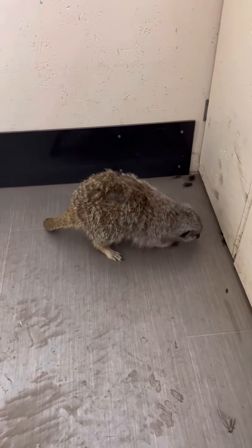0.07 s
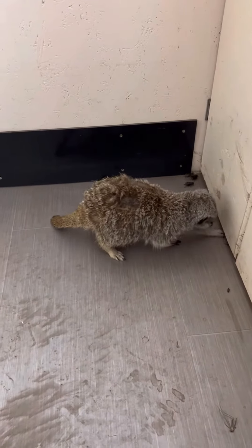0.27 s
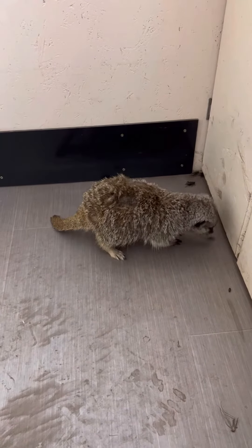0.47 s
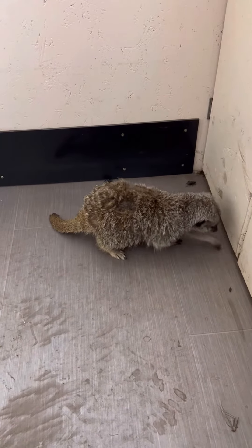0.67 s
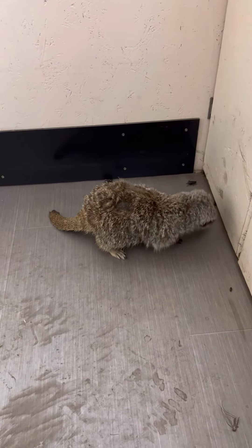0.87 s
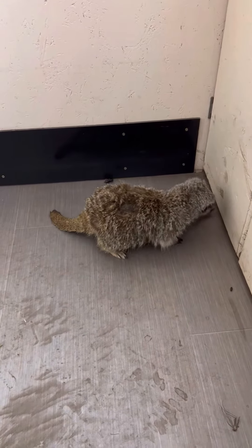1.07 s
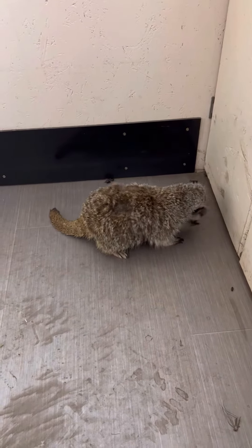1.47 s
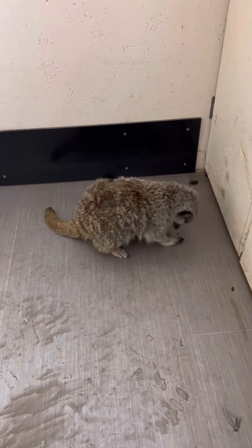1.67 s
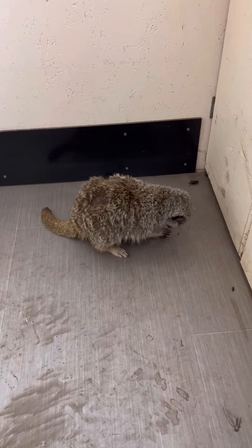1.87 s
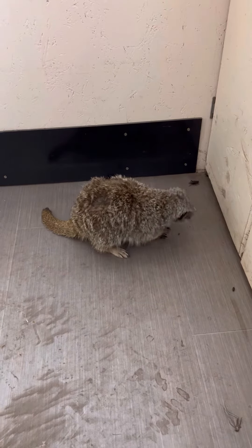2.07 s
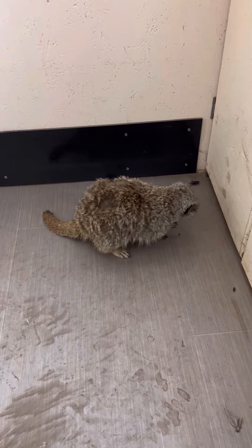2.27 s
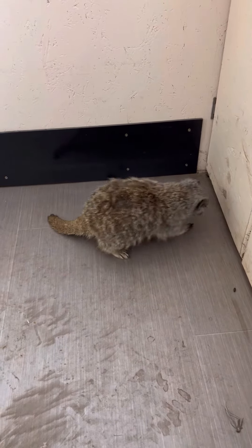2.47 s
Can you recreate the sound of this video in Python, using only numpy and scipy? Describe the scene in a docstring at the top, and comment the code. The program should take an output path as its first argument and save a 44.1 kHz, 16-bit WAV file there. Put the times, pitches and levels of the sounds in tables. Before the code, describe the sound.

Small animal claws scrape and thump a wall panel indoors, then tick on a hard floor.

```python
"""A meerkat paws at a wall panel and patters on the hard floor of a small indoor enclosure.
In each swipe the claws knock and scrape, the paw thuds and the loose panel booms; light claw
ticks and soft shuffles fall in between. A thin three-beat chirp, probably a cricket rubbing its
wings, sounds farther off, with more of the room on it. Heard from nearby on a closely spaced
pair of microphones, over the low rumble of the room."""
import sys
import numpy as np
from scipy import signal
from scipy.fft import rfft, irfft
from scipy.io import wavfile

SR = 44100
rng = np.random.default_rng(int(sys.argv[2]) if len(sys.argv) > 2 else 0)


def inscribe(sig):
    """Save sig as 16-bit PCM at rate SR to the path in sys.argv[1].

    A 1-D sig is mono; a 2-D sig holds one channel per row.
    Samples are clipped to [-1, 1] before scaling.
    """
    pcm = np.round(np.clip(np.atleast_2d(sig).T, -1, 1) * 32767)
    wavfile.write(sys.argv[1], SR, pcm.astype(np.int16))


N = 110250

# room tone, spectra of the air noise and of the rumble: f/Hz, relative level/dB
AIR_SPECTRUM = [(130, -8.5), (370, -17), (840, -23), (1500, -25.5), (2200, -18.5), (3250, -23.5),
                (6400, -25), (8200, -22.5), (9200, -38), (11300, -28), (12200, -77.5), (16000, -91)]
RUMBLE_SPECTRUM = [(30, -39.5), (42, 1), (60, 1.5), (85, -4.5), (125, -4.5), (200, -15.5), (350, -23.5),
                   (600, -64.5)]
# reverberation of the enclosure: f/Hz, t60/s
ROOM_DECAY = [(100, 0.53), (500, 0.32), (1500, 0.39), (4000, 0.37), (8000, 0.37), (11500, 0.44),
              (13000, 0.045)]
# cricket chirps: t/s, level/dB
CRICKET_CHIRPS = [(.197, -42.5), (.922, -44.5), (1.562, -43), (2.278, -43.5)]
# wing beats of one chirp: delay/s, level re chirp/dB, f/Hz
WING_BEATS = [(0, -16.5, 4950), (.054, -3.5, 4985), (.103, -4, 4985)]
# feet shuffle on the floor: t/s, length/s, level/dB, centre f/Hz
FOOT_SHUFFLES = [(0.037, 0.037, -62, 947), (1.644, 0.063, -59.5, 367), (1.883, 0.048, -68, 503),
                 (2.035, .05, -66, 1660), (2.276, 0.22, -65.5, 340)]
# claw tips tick on the floor: t/s, base level/dB, offset of the dull part/dB
FLOOR_TICKS = [(0.028, -53, -2), (0.036, -46, -7.5), (0.151, -48.5, -29), (0.2916, -44, 7),
               (0.3814, -46.5, 0.5), (0.6366, -49, -15), (0.7008, -48, -7), (0.758, -55.5, 2),
               (0.8243, -59, -14), (1.105, -31.5, -21), (1.371, -52, -7.5), (1.4155, -47.5, -15),
               (1.4447, -39, -12), (1.452, -40, -8.5), (1.5308, -40.5, -30), (1.5413, -44, -12),
               (1.5808, -47, -0.5), (1.9577, -43.5, -8), (2.106, -45, -1), (2.1121, -51.5, 9),
               (2.147, -49, -2), (2.1728, -48, -3.5), (2.401, -44, -9), (2.405, -37, -5),
               (2.486, -45, -1.5)]
# spectra of a tick, bright claw tip and dull floor: f/Hz, relative level/dB
TIP_SPECTRUM = [(500, -24.5), (2500, -12.5), (4500, -12), (6000, 6), (7200, 2), (9500, -4.5),
                (11600, -12.5), (13000, -14), (16000, -49)]
FLOOR_SPECTRUM = [(200, -0.5), (700, -12), (1500, -10), (2600, -6), (4000, 13.5), (5500, -12), (9000, -38)]
# the whole panel swings until a paw stills it: t/s, level/dB, free time/s
PANEL_BOOMS = [(0.241, -30, 0.085), (.345, -39.5, 0.099), (0.576, -28, 0.313), (0.928, -22, 0.19),
               (1.105, -21, 0.394), (2.17, -45.5, 0.23)]
# low panel modes, rung by the paw: f/Hz, relative level/dB, t60/s
LOW_MODES = [(95.8, -13, 1), (131.8, -11, 0.57), (175, -4, 0.26), (216, -4.5, 0.096), (304, -20, 0.17),
             (328.2, -5, 0.11), (346.4, -9, 0.27), (380, -12, 0.3), (519.5, -15, 0.34), (748, -14.5, 0.43)]
# high panel modes, rung by the claws: f/Hz, relative level/dB, left minus right/dB
HIGH_MODES = [(1300, -40, 8), (2365, -13.5, 1), (2350, 2, 13), (2827, -8, -15), (3050, -26, -13),
              (3310, 2.5, 11), (4120, 7.5, 0), (4140, -27, -3)]
# the paw lands on the panel: t/s, level/dB, contact time/s, punch f/Hz, punch re ring/dB
PAW_THUDS = [(0.2194, -35.5, 0.0023, 185, -5), (0.2351, -31, 0.002, 347, -21),
             (0.5462, -38.5, 0.00066, 275, -2), (0.5563, -30.5, 0.0029, 154, 3.5),
             (0.9361, -27.5, 0.0015, 180, -13), (1.0967, -30, 0.0013, 236, -16),
             (1.1245, -24, 0.0017, 303.5, -2), (1.896, -43, 0.0053, 85, 2), (2.196, -36.5, 0.0069, 128, -6)]
# claws and pads drag: t/s, length/s, level/dB, treble tilt/(dB per octave)
CLAW_SCRAPES = [(-0.003, 0.098, -59.5, 5), (0.093, 0.093, -61.5, 0.5), (0.189, 0.046, -56, 3),
                (0.208, 0.073, -43, -4.5), (0.245, 0.13, -49, 0), (0.368, 0.056, -51, 1),
                (0.508, 0.074, -39, -1), (0.58, 0.061, -38, -1), (0.671, 0.2, -55, 0.5),
                (0.875, 0.034, -55.5, 3.5), (0.899, 0.068, -36, -2.5), (0.955, 0.11, -49, -1.5),
                (1.086, 0.032, -35, 0.5), (1.111, 0.066, -33.5, -4.5), (1.159, 0.1, -44, -2),
                (1.427, 0.064, -58.5, 4.5), (1.603, 0.12, -66.5, 6), (1.963, 0.037, -56, -0.5),
                (2.037, 0.2, -61.5, 4), (2.358, 0.13, -60, 0.5)]
# spectrum of a scrape before its tilt: f/Hz, relative level/dB
RASP_SPECTRUM = [(200, -2), (700, -5.5), (1100, -7), (1700, -1.5), (2800, -0.5), (4500, -4.5), (7000, -6.5),
                 (8700, -8), (10000, -18), (11600, -16), (12600, -33), (16000, -41)]
# claws knock on the panel: t/s, level/dB, ring f/Hz, crack re ring/dB, catch time/s
CLAW_KNOCKS = [(0.2132, -29, 2980, -7, 0.0045), (.227, -37, 3700, -7.5, 0.0038),
               (0.2306, -32, 2550, -7, 0.0029), (.2725, -38.5, 2930, 2.5, 0.0024),
               (0.3907, -35.5, 4360, -23, 0.0036), (0.397, -36, 3660, -24, 0.005),
               (0.5169, -28.5, 2920, -7.5, 0.0044), (.548, -35, 3940, 6, 0.0017),
               (0.583, -39, 2590, 1, 0.0047), (0.901, -30, 3180, -7, 0.0053),
               (.922, -28, 2520, -11.5, 0.004), (1.082, -32, 4000, -9.5, 0.0048),
               (1.0873, -23, 2900, -9.5, 0.0036), (1.0937, -27.5, 4250, 1, 0.0034),
               (1.12, -23, 4380, -11, 0.0019), (1.1297, -17, 2815, 2.5, 0.0019)]
# spectrum of a knock's woody ring: multiple of the ring pitch, relative level/dB
WOODY_SPECTRUM = [(.1, -36), (.4, -29), (.75, -12), (1, 1), (1.17, -10), (1.45, -7.5), (1.8, -24.5),
                  (4, -45)]
# spectrum of a knock's crack: f/Hz, relative level/dB
CRACK_SPECTRUM = [(200, -31), (800, -10.5), (1500, -2.5), (2700, 2), (4300, -5), (5500, -5.5), (7000, -2.5),
                  (8700, -11.5), (10500, -17), (16000, -34)]

CLAW_SIDE_DB = -8  # stereo width of the animal's sounds, side re mid


def amp(db):
    """Decibels to gain."""
    return 10 ** (np.asarray(db) / 20)


def unit_rms(x):
    """Scales to rms 1."""
    return x / np.sqrt(np.mean(x ** 2) + 1e-20)


def value_at(points, hz):
    """Reads a table on a log-frequency axis."""
    f, value = np.transpose(points)
    return np.interp(np.log(hz + 1), np.log(f + 1), value)


def add(mix, start, sound):
    """Mixes a sound in at a start time in seconds."""
    part = mix[..., max(round(start * SR), 0):][..., :sound.shape[-1]]
    part += sound[..., :part.shape[-1]]


def filtered(x, order, hz, kind):
    """Causal Butterworth filter."""
    return signal.sosfilt(signal.butter(order, hz, kind, fs=SR, output="sos"), x)


def colour(x, spectrum, tilt_db=0, size=4096, pivot_hz=3530):
    """Causal filter of unit energy with the given spectrum and tilt per octave."""
    hz = abs(np.fft.fftfreq(size, 1 / SR))
    octaves = np.log2(np.maximum(hz / pivot_hz, 0.1))
    log_gain = np.log(amp(value_at(spectrum, hz) + tilt_db * octaves))
    minimum_phase = np.exp(np.conj(signal.hilbert(log_gain)))
    taps = np.fft.ifft(minimum_phase).real[:size // 2]
    return signal.fftconvolve(x, taps[None] / np.linalg.norm(taps), axes=1)[:, :x.shape[1]]


def stereo_noise(size, side_db):
    """Two channels of noise, more alike the lower side_db is."""
    mid, side = rng.standard_normal((2, size))
    return unit_rms(mid + amp(side_db) * np.array([side, -side]))


def wobble(span_s):
    """A smooth random curve of rms 1 that changes over about span_s seconds."""
    hz = np.fft.rfftfreq(N, 1 / SR)
    return unit_rms(irfft(rfft(rng.standard_normal(N)) * np.exp(-(hz * span_s) ** 2), N))


def snap(decay_s, rise_s=0.00039, size=2048):
    """A tiny cluster of contacts that dies within milliseconds."""
    t = np.arange(size) / SR
    fade = np.exp(-t / decay_s) * (1 - np.exp(-t / rise_s))
    return unit_rms(stereo_noise(size, CLAW_SIDE_DB) * fade) * np.sqrt(np.mean(fade ** 2))


def room_tone(rumble_db=-58.5, waver_db=3.5, air_db=-67.5):
    """A wavering rumble, alike at both microphones, and faint air noise all around."""
    t = np.arange(N) / SR
    waver = unit_rms(sum(np.sin(2 * np.pi * (hz * t + rng.random())) for hz in np.geomspace(2, 12, 20)))
    rumble = unit_rms(colour(stereo_noise(N, side_db=-59), RUMBLE_SPECTRUM, size=16384))
    air = unit_rms(colour(stereo_noise(N, side_db=1.2), AIR_SPECTRUM))
    return amp(rumble_db - waver_db * waver) * rumble + amp(air_db) * air


def room_echo(x, early_db=-4.5, early_s=0.013, tail_db=-11.5, correlation=0.78, echo_top_hz=12400):
    """Quick reflections from the corner, then the tail of a small hard room."""
    size = SR // 2
    t = np.arange(size) / SR
    left, other = rng.standard_normal((2, size))
    right = correlation * left + np.sqrt(1 - correlation ** 2) * other
    hz, frame_s, spectra = signal.stft(np.array([left, right]), SR, nperseg=256)
    decay = amp(-60 * frame_s / value_at(ROOM_DECAY, hz)[:, None])
    tail = signal.istft(spectra * decay, SR, nperseg=256)[1][:, :size] * np.minimum(t / 0.0057, 1)
    early = stereo_noise(size, side_db=0.3) * np.exp(-t / early_s)
    early *= (rng.random(size) < 1500 / SR) * (t > 0.002)  # sparse arrivals after 2 ms
    response = (amp(tail_db) * unit_rms(tail) + amp(early_db) * unit_rms(early)) / np.sqrt(size)
    return signal.fftconvolve(x, filtered(response, 4, echo_top_hz, "low"), axes=1)[:, :N]


def close_pair(x, below_hz=430, share=0.62):
    """The microphones sit close together, so low sounds reach both much alike."""
    low_side = signal.sosfiltfilt(signal.butter(2, below_hz, fs=SR, output="sos"), (x[0] - x[1]) / 2)
    return x - share * np.array([low_side, -low_side])


def cricket(beat_s=0.017, sag_hz_per_s=6200, wing_gap_hz=170, wing_db=-6.5, roughness=0.22):
    """Three strokes a chirp; the two wings ring slightly apart, so each stroke flutters as it sags."""
    out, t = np.zeros(N), np.arange(0, beat_s, 1 / SR)
    swell = np.sin(np.pi * t / beat_s)
    for start, db in CRICKET_CHIRPS:
        for delay, beat_db, hz in WING_BEATS:
            cycles = np.cumsum(hz - sag_hz_per_s * (t - beat_s / 2)) / SR
            wings = np.sin(2 * np.pi * cycles)
            wings += amp(wing_db) * np.sin(2 * np.pi * (cycles + wing_gap_hz * t + rng.random()))
            jitter = signal.oaconvolve(rng.standard_normal(4096), np.hanning(SR // 400), "valid")
            teeth = 1 + roughness * unit_rms(jitter)[:len(t)]
            add(out, start + delay, amp(db + beat_db) * teeth * swell * wings)
    return np.array([out, out])


def foot_shuffles(edge_ratio=1.14):
    """Pads and fur brush the floor in short, hollow puffs."""
    out = np.zeros((2, N))
    for start, length, db, hz in FOOT_SHUFFLES:
        size = round(length * SR)
        noise = stereo_noise(SR // 2, CLAW_SIDE_DB)
        puff = filtered(noise, 2, [hz / edge_ratio, hz * edge_ratio], "band")[:, -size:]
        add(out, start, amp(db) * np.hanning(size) * unit_rms(puff))
    return out


def floor_ticks(decay_s=0.0018, tip_gain_db=3, floor_gain_db=5):
    """Claw tips click brightly, with a duller part from the floor."""
    out = np.zeros((2, N))
    for start, db, dull_db in FLOOR_TICKS:
        tip = amp(tip_gain_db) * colour(snap(decay_s), TIP_SPECTRUM)
        floor = amp(floor_gain_db + dull_db) * colour(snap(decay_s), FLOOR_SPECTRUM)
        add(out, start, amp(db) * (tip + floor))
    return out


def panel_booms(hz=60.77, rise_s=0.096, fall_db_per_s=63, still_s=0.0054, lag_s=0.000059):
    """The lowest mode builds as the paw lets go, dies slowly and is stilled by the next touch."""
    left, t = np.zeros(N), np.arange(SR) / SR
    rise = np.sin(np.pi / 2 * np.minimum(t / rise_s, 1))
    for start, db, free_s in PANEL_BOOMS:
        damping = np.exp(-np.maximum(t - free_s, 0) / still_s)
        add(left, start, amp(db - fall_db_per_s * t) * rise * damping * np.sin(2 * np.pi * hz * t))
    clock = np.arange(N) / SR
    right = np.interp(clock - lag_s, clock, left)  # reaches this microphone slightly later
    return np.array([left, right])


def panel_shimmer(claws, gain_db=2, t60_s=0.05, drift=0.012):
    """Claw contacts ring on in the panel's high modes, which drift as the paws press and move."""
    out, pole = np.zeros((2, N)), amp(-60 / SR / t60_s)
    for hz, db, pan_db in HIGH_MODES:
        carrier = np.exp(2j * np.pi * np.cumsum(hz * (1 + drift * wobble(0.16))) / SR)
        envelope = signal.lfilter([1 - pole], [1, -pole], claws / carrier + 1e-18)
        ring = 2 * (carrier * envelope * np.exp(2j * np.pi * rng.random())).real
        out += amp(db + np.array([[pan_db], [-pan_db]]) / 2) * ring
    return amp(gain_db) * out


def paw_thuds(punch_s=0.0098, low_cut_hz=121.4):
    """The paw lands with a punch and rings the panel's low modes; little radiates below them."""
    out, t = np.zeros(N), np.arange(SR // 2) / SR
    ring = sum(amp(db - 60 * t / t60) * np.sin(2 * np.pi * hz * t) for hz, db, t60 in LOW_MODES)
    for start, db, contact_s, punch_hz, punch_db in PAW_THUDS:
        push = np.sin(np.pi * np.arange(0, contact_s, 1 / SR) / contact_s)
        add(out, start - contact_s / 2, amp(db) * signal.fftconvolve(ring, push / push.sum()))
        punch = np.exp(-t / punch_s) * np.sin(2 * np.pi * punch_hz * t)
        add(out, start, amp(db + punch_db) * punch)
    return filtered(out, 3, low_cut_hz, "high")


def claw_scrapes(grains_per_s=5000, spread_db=2, clump_db=3, clump_s=0.0033):
    """Stick-slip grains come in uneven clumps that swell and fade under each stroke."""
    out = np.zeros((2, N))
    slips = stereo_noise(N, CLAW_SIDE_DB) * (rng.random(N) < grains_per_s / SR)
    slips *= amp(spread_db * np.minimum(rng.exponential(1, N), 4))
    slips *= amp(clump_db * wobble(clump_s))
    for start, length, db, tilt_db in CLAW_SCRAPES:
        progress = np.arange(0, length, 1 / SR) / length
        stroke = np.interp(progress, [0, 0.39, 1], [0, 1, 0]) ** 0.93
        grains = np.roll(slips, -round(start * SR), axis=1)[:, :len(stroke)]
        add(out, start, amp(db) * stroke * unit_rms(colour(grains, RASP_SPECTRUM, tilt_db)))
    return out


def claw_knocks():
    """A claw catches for a few milliseconds: a woody burst around one pitch, with a broad crack."""
    out = np.zeros((2, N))
    for start, db, hz, crack_db, catch_s in CLAW_KNOCKS:
        woody = colour(snap(catch_s), [(ratio * hz, level) for ratio, level in WOODY_SPECTRUM])
        crack = amp(crack_db) * colour(snap(catch_s), CRACK_SPECTRUM)
        add(out, start, amp(db) * (woody + crack))
    return out


def scene(cricket_echo_db=7.5):
    """The enclosure from the microphones: meerkat and panel near, the cricket deeper in the room."""
    claws = claw_knocks() + claw_scrapes()
    chirps = cricket()
    meerkat = claws + panel_shimmer(claws) + floor_ticks() + foot_shuffles()
    echo = room_echo(meerkat + amp(cricket_echo_db) * chirps)
    return close_pair(meerkat + chirps + echo) + paw_thuds() + panel_booms() + room_tone()


def record(dry):
    """The recorder's low cut at 21.6 Hz and band limit at 16 kHz."""
    band_limit = signal.firwin(511, 16000, window=("kaiser", 9), fs=SR)
    return signal.oaconvolve(filtered(dry, 3, 21.6, "high"), band_limit[None], "same")


dry = scene()
out = record(dry)
inscribe(out)
```